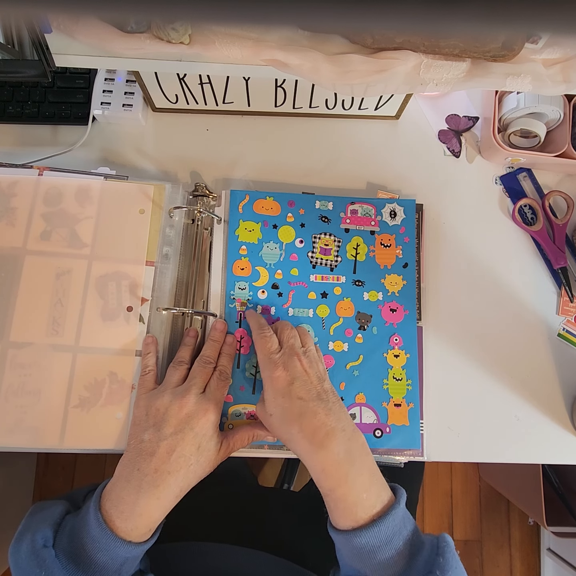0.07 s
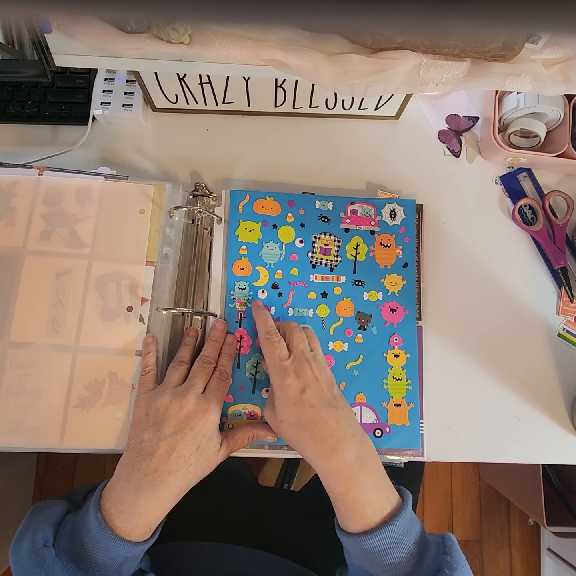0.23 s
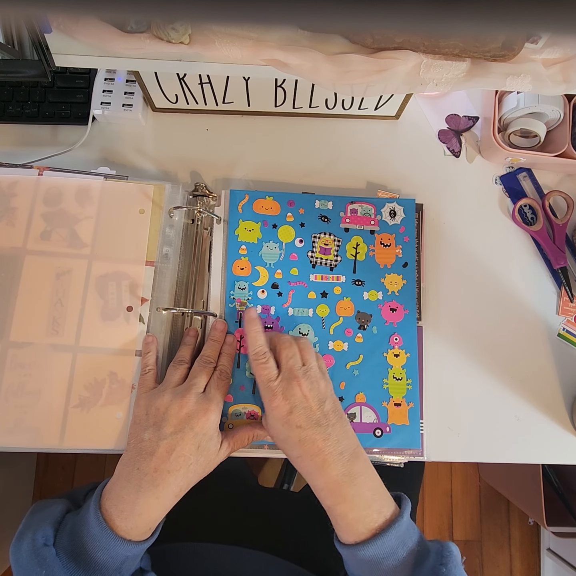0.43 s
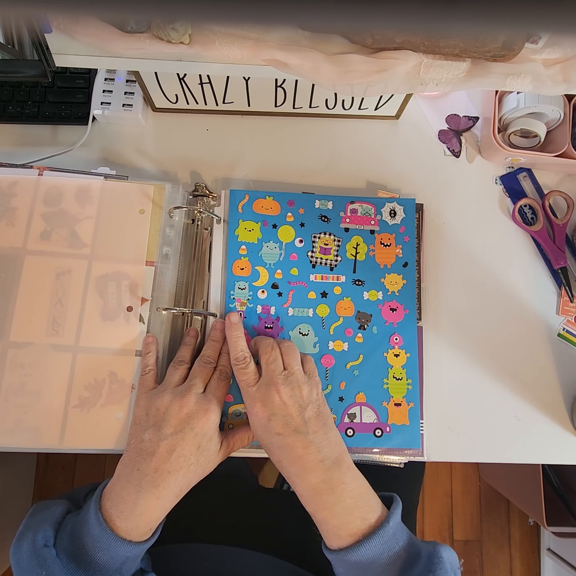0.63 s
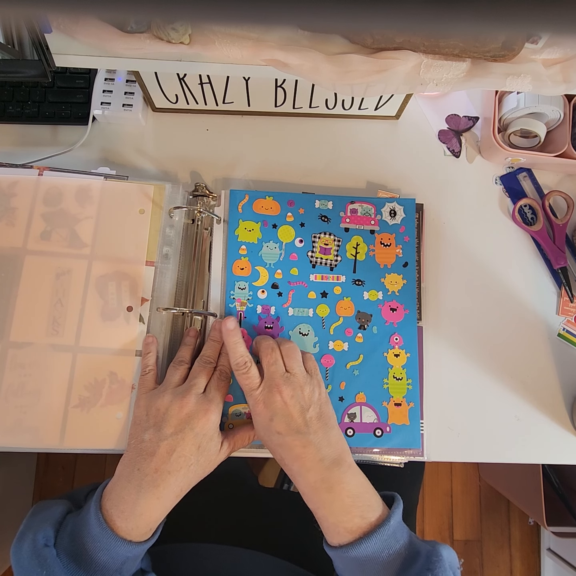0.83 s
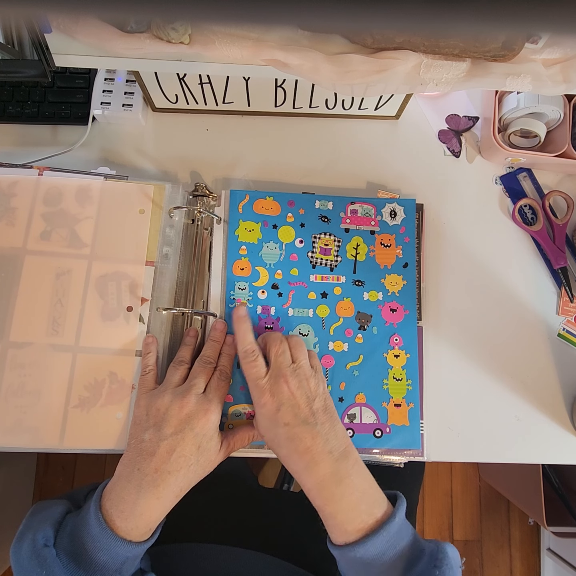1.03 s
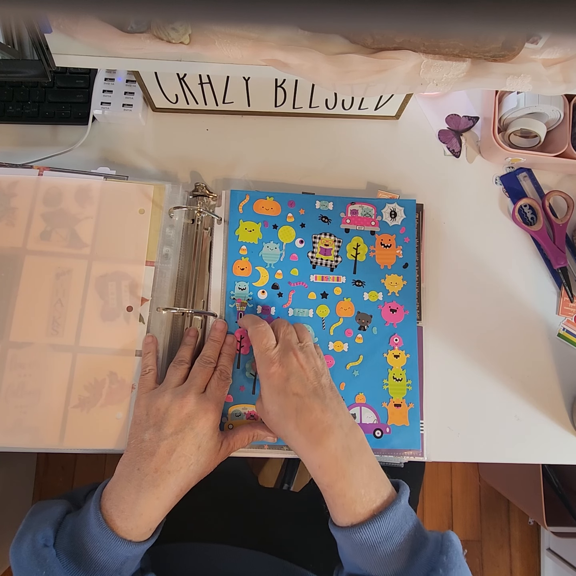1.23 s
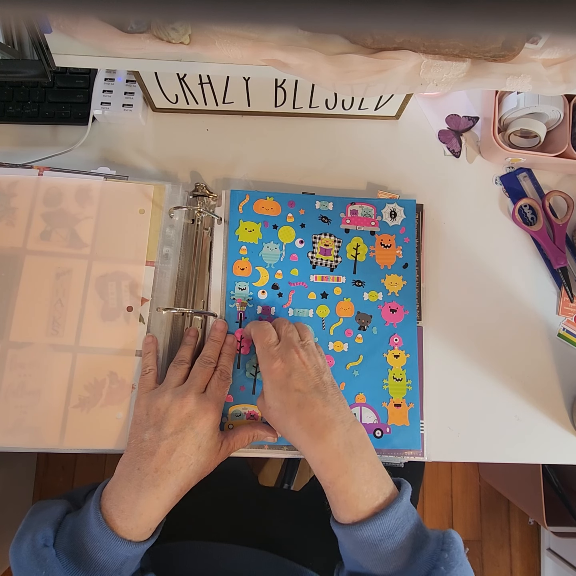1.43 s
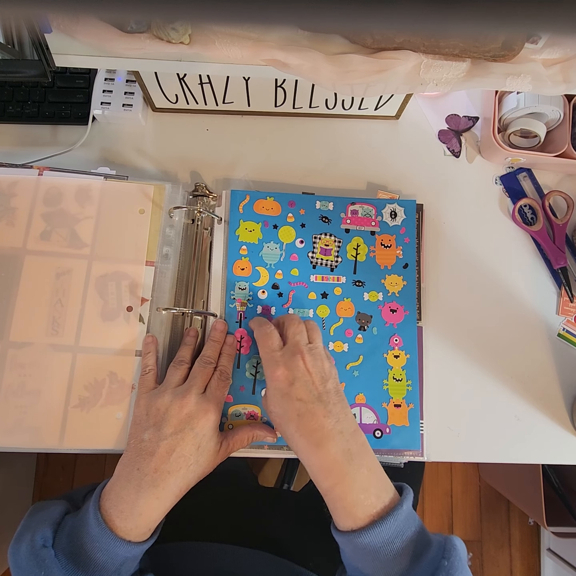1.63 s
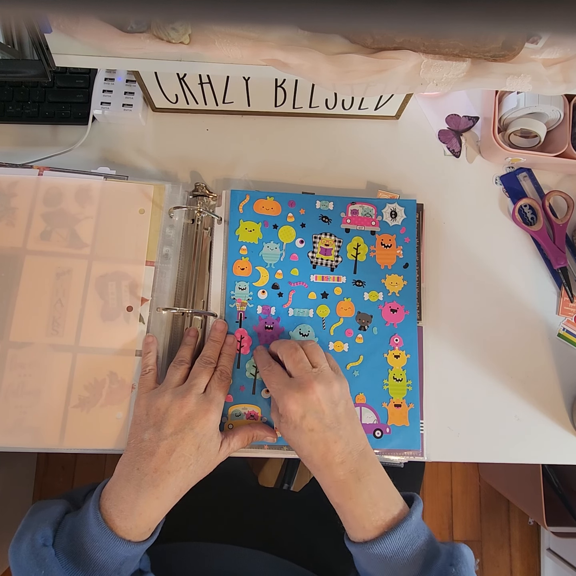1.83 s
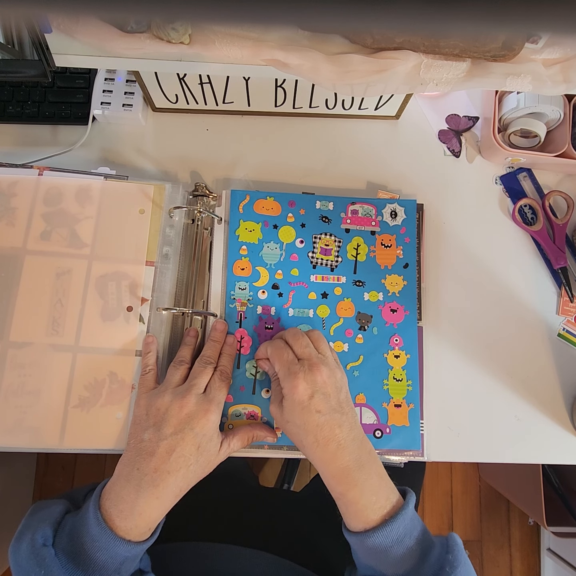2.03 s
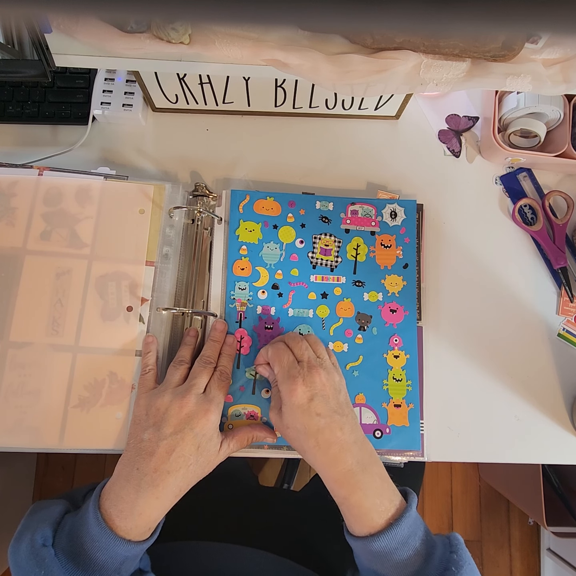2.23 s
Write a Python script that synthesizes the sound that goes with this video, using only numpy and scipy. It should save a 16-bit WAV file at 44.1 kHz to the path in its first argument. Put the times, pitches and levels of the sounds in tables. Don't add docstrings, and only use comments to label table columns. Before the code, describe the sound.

A sticker peels from its backing sheet: faint dull nail ticks first, then a tight crackle of snaps midway and a longer, louder run near the end, close stereo microphone, small room with ventilation hum.

```python
import sys
import numpy as np
from scipy import signal
from scipy.fft import rfft, irfft
from scipy.io import wavfile

SR = 44100
rng = np.random.default_rng(int(sys.argv[2]) if len(sys.argv) > 2 else 0)


def to_wav(s):
    ch = np.atleast_2d(s).T
    pcm = np.round(np.clip(ch, -1, 1) * 32767)
    wavfile.write(sys.argv[1], SR, pcm.astype(np.int16))


def level_to_linear(level):
    exponent = np.asarray(level, float) / 20
    return 10 ** exponent


N = 101121


def at_hz(points, hz):
    p = np.array(points)
    return np.interp(np.log(hz), np.log(np.maximum(p[:, 0], 1)), p[:, 1])


def highpass(x, hz):
    return signal.sosfilt(signal.butter(2, hz, "high", fs=SR, output="sos"), x)


def clicks(start_s, gains):
    onset_s = 0.0011
    out = np.zeros(N)
    places = np.round((np.asarray(start_s) + onset_s) * SR).astype(int)
    np.add.at(out, places, gains)
    return out


def ring(x, hz, t60_s):
    radius = level_to_linear(-60 / (t60_s * SR))
    turn = 2 * np.pi * hz / SR
    return signal.lfilter([0, np.sin(turn)], [1, -2 * radius * np.cos(turn), radius ** 2], x + 1e-18)


SNAP_START_S = [1.5113, 1.5131, 1.5164, 1.5290, 1.5326, 1.5434, 1.5610, 1.9913, 2.0472, 2.0860, 2.0998,
                2.1164, 2.1271, 2.2108, 2.2302, 2.2498, 2.2506]
# peak_db [dB], sheet_db [dB], high_ring_db [dB], treble_db [dB]
SNAP_STRENGTH = [(1.5, 4.5, 0, 4.5), (-7, 3.0, 1.5, 5), (-14.5, 5, -3.5, 2), (-17.5, 7.5, -1.5, 3),
                 (-12.5, 5.5, -2, 2), (-11.5, 7.5, -3.5, 5), (-23, 0.5, 0.5, -0.5), (-2, 2.5, 2, 1),
                 (1, 0.5, 3, 2), (1.5, -4.5, 2, -1), (3.5, 1.5, -1.5, 2), (-0.5, -2.2, -2, 1),
                 (-31, 0.1, 0.1, 11), (2.5, 0, -1.5, -1), (2, -6, -5, -3), (2, -1, 0.5, -1.5),
                 (-5, -11, 2, -1.5)]


def snaps(port):
    peak_db, sheet_db, high_ring_db, treble_db = np.transpose(SNAP_STRENGTH)
    colour_db = 1.5 * rng.standard_normal((len(peak_db), len(port)))
    trains = []
    for k, (hz, _, _) in enumerate(port):
        level_db = peak_db + colour_db[:, k]
        if 3000 < hz < 4400:
            level_db = level_db + sheet_db
        if 5900 < hz < 6900:
            level_db = level_db + high_ring_db
        if hz > 10000:
            level_db = level_db + treble_db
        trains.append(clicks(SNAP_START_S, -level_to_linear(level_db)))
    return trains


# start_s [s], peak_db [dB], hardness [-1 dull, 0 like a snap, 1 thin]
NAIL_TICKS = [(.2250, -27.5, -0.78), (.7150, -35, -0.71), (1.1235, -54.5, 0.77), (1.2054, -55, 0.52),
              (1.2144, -61, 0.34), (1.2994, -55, .7), (1.3385, -45.5, 0.69), (1.3841, -64.5, 0.71),
              (1.3865, -36.5, 0.62), (1.4114, -53.5, 0.32), (1.4637, -57.5, -0.11), (1.5798, -38, -0.46),
              (1.8816, -54, 0.82), (1.957, -34.5, 0.8)]
TICK_DB = 12.5


def nail_ticks():
    thin_cut_hz, dull_cut_hz = 8700, 3450
    start_s, peak_db, hardness = np.transpose(NAIL_TICKS)
    thin, dull = np.clip(hardness, 0, 1), np.clip(-hardness, 0, 1)
    push = -level_to_linear(peak_db + TICK_DB)
    plain_ticks = clicks(start_s, push * (1 - thin - dull))
    thin_ticks = highpass(clicks(start_s, push * thin), thin_cut_hz)
    lowpass = signal.butter(2, dull_cut_hz, fs=SR, output="sos")
    dull_ticks = signal.sosfilt(lowpass, clicks(start_s, push * dull))
    return plain_ticks + thin_ticks + dull_ticks


def knock():
    knock_db, low_hz, high_hz = -9.0, 300, 2600
    start_s, peak_db, hardness = np.transpose(NAIL_TICKS)
    push = clicks(start_s, -level_to_linear(peak_db + TICK_DB + knock_db) * np.clip(-hardness, 0, 1))
    band = signal.butter(1, [low_hz, high_hz], "band", fs=SR, output="sos")
    return signal.sosfilt(band, push + 1e-18)


# start_s [s], level_db [dB]
RUB_LEVEL = [(0, -95), (1.1, -80), (1.36, -72), (1.41, -95), (1.45, -60), (1.7, -98), (1.79, -68),
             (1.85, -79), (2.29, -82)]


def skin_rub():
    grains_per_s, cut_hz = 4600, 5200
    start_s, level_db = np.transpose(RUB_LEVEL)
    grains = (rng.random(N) < grains_per_s / SR) * rng.standard_normal(N)
    swell = level_to_linear(np.interp(np.arange(N) / SR, start_s, level_db))
    return highpass(grains, cut_hz) * swell


# left_s [s], right_s [s], level_db [dB]
NEAR_BOUNCES = [
    (.00016, .00024, 0),
    (.0011, .0013, -13),
    (.0027, .0030, -17),
]


def room():
    desk_db, desk_t60_s = -24, 0.022
    wall_s, wall_rise_s = 0.0062, 0.00088
    wall_db, wall_t60_s = -31, 0.18
    late_db, late_t60_s = -56.5, 0.47
    t = np.arange(SR // 2) / SR
    desk_noise, wall_noise = rng.standard_normal((2, 2, len(t)))
    near = desk_noise * level_to_linear(desk_db - 60 * t / desk_t60_s)
    near[:, 0] = 1
    for left_s, right_s, level_db in NEAR_BOUNCES:
        near[[0, 1], [round(left_s * SR), round(right_s * SR)]] += level_to_linear(level_db)
    since_s = np.maximum(t - wall_s, 0)
    fade = level_to_linear(wall_db - 60 * since_s / wall_t60_s) + level_to_linear(late_db - 60 * since_s / late_t60_s)
    walls = wall_noise * (1 - np.exp(-since_s / wall_rise_s)) * fade
    return near, walls


# pitch_hz [Hz], level_db [dB], t60_s [s]
LEFT_RESONANCES = [(1398, -45, 0.0014), (3500, -18.5, 0.011), (4500, -3.5, 0.0013), (6306, -4.5, 0.0021),
                   (8400, -2.5, 0.001), (10930, -25, .003), (12900, -55, 0.0059), (13900, -21.5, 0.0039)]
# pitch_hz [Hz], level_db [dB], t60_s [s]
RIGHT_RESONANCES = [(1880, -17, 0.0041), (3370, -28, 0.0013), (4080, -5.5, .004), (4810, -12, 0.0048),
                    (6270, -19.5, 0.0042), (11330, -22, 0.009), (12930, -10, 0.0029), (14260, -19.5, .004)]
STICKER_CUT_HZ = (823, 1440)


def sticker():
    touch_room_db = -2.5
    touch = nail_ticks() + skin_rub()
    near, walls = room()
    out = []
    for k, port in enumerate((LEFT_RESONANCES, RIGHT_RESONANCES)):
        loud, faint = np.zeros(N), np.zeros(N)
        for train, (hz, level_db, t60_s) in zip(snaps(port), port):
            loud += level_to_linear(level_db) * ring(train, hz, t60_s)
            faint += level_to_linear(level_db) * ring(touch, hz, t60_s)
        heard = signal.fftconvolve(loud + faint, near[k])
        heard += signal.fftconvolve(loud + level_to_linear(touch_room_db) * faint, walls[k])
        cut_hz = STICKER_CUT_HZ[k]
        out.append(highpass(highpass(heard[:N], cut_hz), cut_hz / 2))
    return np.array(out)


def thump():
    start_s, level_db, pitch_hz, width_s = 1.65, -38.5, 52, 0.024
    t = np.arange(N) / SR - start_s
    return level_to_linear(level_db) * np.exp(-(t / width_s) ** 2) * np.cos(2 * np.pi * pitch_hz * t)


# pitch_hz [Hz], level_db [dB per Hz]
AIR_SPECTRUM = [(20, -12.5), (100, -4), (270, -12), (700, -14.5), (3600, -26), (5200, -42.5), (8300, -58),
                (15800, -65.5)]
# pitch_hz [Hz], width_hz [Hz], level_db [dB over the air]
BACKGROUND_HUMPS = [(62, 12, 8), (121, 31, 7), (190.8, 18, 8), (274.3, 11, 11.5), (326, 31, 8.5), (890, 340, 1),
                    (1443, 79.7, 9), (1767, 550, 8.5), (3320, 140, 5.5), (6240, 460, -7), (7800, 800, 12.5)]
# pitch_hz [Hz], share [0 to 1]
AIR_LIKENESS = [(40, .8), (150, .92), (350, .85), (1000, .72), (3000, .45), (8000, .1)]
# pitch_hz [Hz], level_db [dB]
AIR_BALANCE = [(60, -2), (240, 1.5), (950, 3.5), (3770, -4.5), (15000, 27.5)]


def air():
    air_db, lead_s = -45, 0.00026
    hz = np.maximum(np.fft.rfftfreq(N, 1 / SR), 1)
    shared, left, right = rfft(rng.standard_normal((3, N)))
    level_db = at_hz(AIR_SPECTRUM, hz)
    for pitch_hz, width_hz, hump_db in BACKGROUND_HUMPS:
        level_db = level_db + hump_db / (1 + (2 * (hz - pitch_hz) / width_hz) ** 2)
    alike = np.clip(at_hz(AIR_LIKENESS, hz), 0, 1)
    pan = level_to_linear(at_hz(AIR_BALANCE, hz) / 2)
    lead = np.exp(2j * np.pi * hz * lead_s)
    pair = np.sqrt(alike) * shared * np.array([lead, np.ones_like(lead)])
    pair = pair + np.sqrt(1 - alike) * np.array([left, right])
    out = irfft(pair * level_to_linear(level_db) * np.array([pan, 1 / pan]), N)
    return level_to_linear(air_db) * out / out.std()


def scene():
    return sticker() + knock() + thump() + air()


def smear(x):
    length_s, level_db, cut_hz = 0.021, -41.5, 2200
    count = int(length_s * SR)
    swell = np.sin(np.pi / 2 * np.arange(count) / count) ** 2
    kernel = level_to_linear(level_db) * swell * rng.standard_normal((2, count))
    spread = signal.fftconvolve(highpass(x, cut_hz), kernel, axes=1)
    ahead = spread[:, count:count + N - 1]
    return np.pad(ahead, ((0, 0), (0, 1)))


def low_pass(x):
    return signal.sosfilt(signal.butter(12, 16660, fs=SR, output="sos"), x)


def record(dry):
    notch_hz, notch_width_hz = 9700, 1900
    softness, ceiling, top_hz = 1.3, 0.86, 16600
    x = signal.lfilter(*signal.iirnotch(notch_hz, notch_hz / notch_width_hz, fs=SR), dry)
    x = np.clip(softness * np.tanh(x / softness), -ceiling, ceiling)
    x = x + smear(x)
    x = signal.sosfilt(signal.cheby2(12, 60, top_hz, fs=SR, output="sos"), x)
    return low_pass(x)


dry = scene()
out = record(dry)
to_wav(out)
```